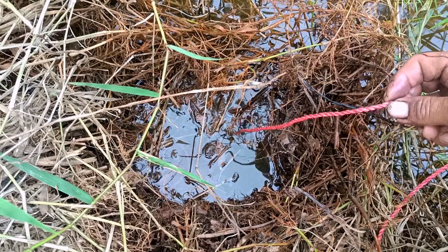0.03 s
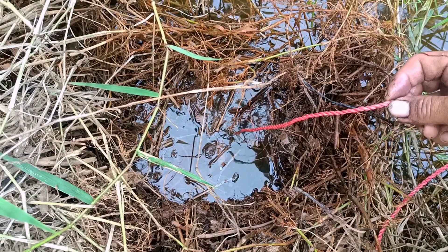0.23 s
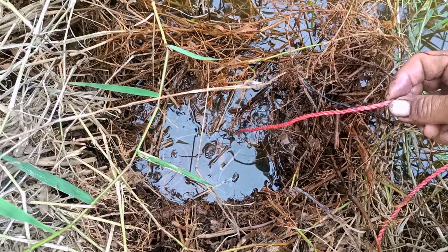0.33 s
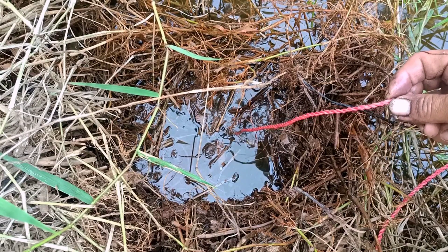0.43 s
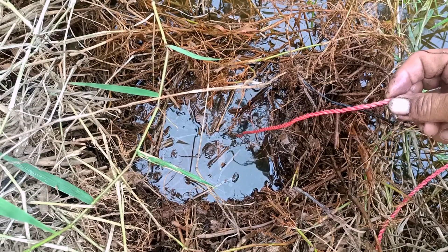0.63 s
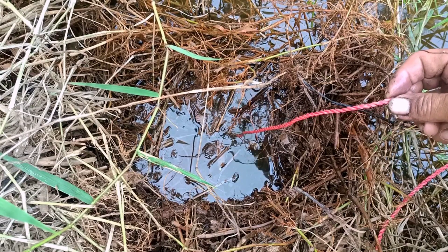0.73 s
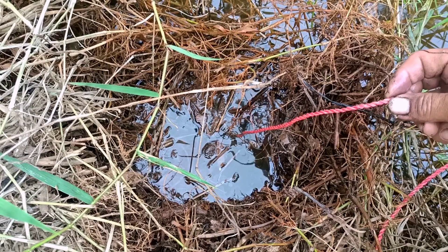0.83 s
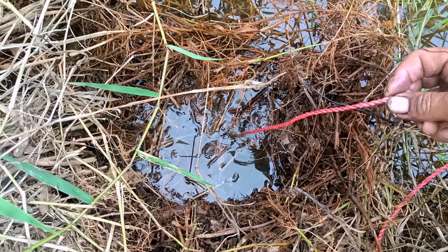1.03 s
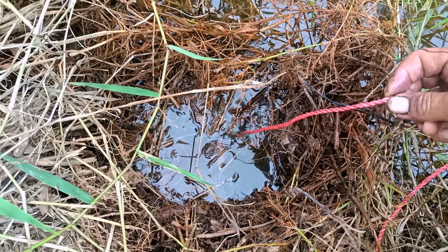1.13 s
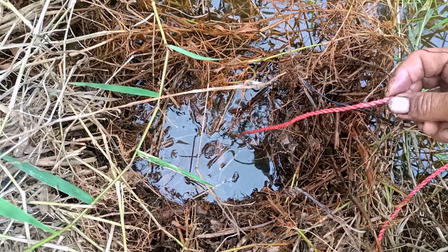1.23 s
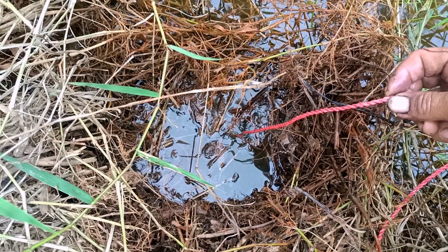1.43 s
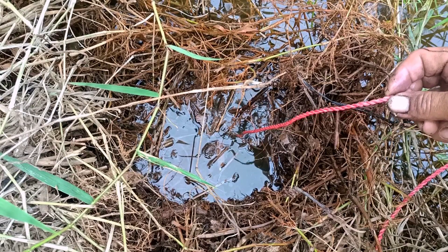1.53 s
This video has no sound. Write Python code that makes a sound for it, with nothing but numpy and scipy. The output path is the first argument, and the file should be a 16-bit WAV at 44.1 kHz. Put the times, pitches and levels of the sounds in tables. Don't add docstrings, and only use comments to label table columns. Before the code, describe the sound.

Close, crisp scraping ticks, a little to the right, come in two quick runs of three, the first tick strongest; behind them thin high insects chirr steadily outdoors over a faint far rumble and slight air hiss.

```python
import sys
import numpy as np
from scipy import signal
from scipy.io import wavfile
from scipy.ndimage import uniform_filter1d

SR = 44100
rng = np.random.default_rng(int(sys.argv[2]) if len(sys.argv) > 2 else 0)


def dump(signal):
    limited = np.clip(np.atleast_2d(signal).T, -1, 1)
    pcm = np.round(limited * 32767).astype(np.int16)
    wavfile.write(sys.argv[1], SR, pcm)


def gain_from_decibels(decibels):
    exponent = np.asarray(decibels, float) / 20
    return 10 ** exponent


N = 68355
SNAP_S = .00007
PULL_AT_S = 8 * SNAP_S


def read(points, hz):
    f, value = np.transpose(points)
    return np.interp(np.log(hz + 1), np.log(f + 1), value)


def evened(x):
    return x / np.sqrt(np.mean(x ** 2) + 1e-20)


def sides(left_db, right_db):
    return gain_from_decibels(np.array([[left_db], [right_db]]))


def add(mix, s, sound):
    part = mix[round(s * SR):][:len(sound)]
    part += sound[:len(part)]


def colour(x, points):
    size = 2048
    log_gain = np.log(gain_from_decibels(read(points, abs(np.fft.fftfreq(size, 1 / SR)))))
    phase = -signal.hilbert(log_gain).imag
    taps = np.fft.ifft(np.exp(log_gain + 1j * phase)).real[:size // 2]
    return signal.oaconvolve(x, taps)[:len(x)]


def resonate(x, hz, width):
    turn = np.exp(2j * np.pi * np.cumsum(hz * np.ones(len(x))) / SR)
    r = np.exp(-np.pi * width / SR)
    return 2 * (turn * signal.lfilter([1 - r], [1, -r], x / turn)).real


def drift(top_hz):
    t = np.arange(N) / SR
    speeds = np.geomspace(.5, top_hz, 16)
    return evened(sum(np.sin(2 * np.pi * (f * t + rng.random())) / np.sqrt(f) for f in speeds))


def hiss(points, same, patch_db):
    frames, hz = N // 256 + 5, np.fft.rfftfreq(1024, 1 / SR)
    a, b, c, d, patches = rng.standard_normal((frames, 513, 5)).T
    patches = uniform_filter1d(patches, size=6, axis=0)
    patches = evened(uniform_filter1d(patches, size=8, axis=1))
    left, other = a + 1j * b, c + 1j * d
    z = np.array([left, same * left + np.sqrt(1 - same ** 2) * other])
    z = z * gain_from_decibels(read(points, hz)[:, None] + patch_db * patches)
    return evened(signal.istft(z, nperseg=1024, noverlap=768)[1][:, :N])


def insect(hz, width, throbs, depth, left_db, right_db):
    strokes_per_s, waver, glide, swell_db = 14000, .03, .004, 1.3
    turns = np.cumsum(throbs * (1 + waver * drift(3.1))) / SR
    throb = 1 - depth * (.5 + .5 * np.cos(2 * np.pi * turns))
    strikes = rng.standard_normal((2, N)) * (rng.random((2, N)) < strokes_per_s / SR)
    level = throb * gain_from_decibels(swell_db * drift(12))
    note = hz * (1 + glide * np.sin(2 * np.pi * turns))
    wings = []
    for strike in strikes:
        ringing = resonate(strike * level, note, width)
        wings.append(evened(resonate(ringing, note, 1.5 * width)))
    return np.array(wings) * sides(left_db, right_db)


def chorus():
    # pitch in Hz, width in Hz, throbs per second, throb depth 0-1, left dB, right dB
    bands = [(9800, 720, 98, .4, -67, -108), (7080, 450, 77, .25, -90, -70.5),
             (6600, 250, 70, .3, -108, -82), (4800, 450, 72, .3, -93, -87)]
    return sum(insect(*row) for row in bands)


def caller(effort, hz, fall_hz, pace, left_db, right_db):
    sharp, rough, spread_db, pace_waver = 1.3, .0045, 1.8, .005
    first_pulse = .27
    turns = first_pulse + np.cumsum(pace * (1 + pace_waver * drift(6))) / SR
    part = turns % 1
    each = rng.standard_normal((400, 2))[turns.astype(int)]
    wobble = evened(uniform_filter1d(rng.standard_normal(N), size=60))
    note = hz * (1 + rough * (each[:, 0] + 3 * wobble)) + fall_hz * (1 - 2 * part)
    effort_db = np.interp(np.arange(N) / SR, *np.transpose(effort))
    level = np.sin(np.pi * part) ** (2 * sharp) * gain_from_decibels(spread_db * each[:, 1] + effort_db)
    tone = np.sin(2 * np.pi * np.cumsum(note) / SR)
    return evened(level * tone) * sides(left_db, right_db)


def callers():
    # pitch in Hz, fall in Hz, pulses per second, left dB, right dB
    steady = [(9900, 340, 87.6, -63.5, -110), (7080, 250, 78, -100, -78)]
    # time in seconds, level in dB
    steady_effort = [(0.0, -70.5), (0.072, -71), (0.708, -75), (0.846, -74), (1.018, -70), (1.126, -70.5),
                     (1.442, -73.5), (1.55, -70.5)]
    # pitch in Hz, fall in Hz, pulses per second, left dB, right dB
    low = (4830, 200, 70, -84, -88)
    # time in seconds, level in dB
    low_effort = [(0, -14), (.35, -12), (.48, -2), (.6, 0), (.74, -2), (.85, -12), (1.2, -14), (1.55, -9)]
    return sum(caller(steady_effort, *row) for row in steady) + caller(low_effort, *low)


def far_rumble():
    # frequency in Hz, level in dB
    spectrum = [(15, -36.5), (25, -4), (85, 3), (170, -4), (260, -16), (340, -24), (600, -39),
                (1000, -74.5)]
    return gain_from_decibels(-54.5) * hiss(spectrum, same=0.97, patch_db=1.2) * sides(-.3, .3)


def air_noise():
    # frequency in Hz, level in dB
    spectrum = [(100, -9), (300, 2), (500, -3), (1000, -6.5), (2000, -12), (4000, -19), (8000, -26),
                (16000, -28.5)]
    return gain_from_decibels(-67.5) * hiss(spectrum, same=0.17, patch_db=2)


def modes(table, chance, scale, wave):
    detune, spread_db = .012, 1.5
    t, out = np.arange(1500) / SR, 0
    for (f, db, t60), (u, v) in zip(table, chance):
        fade = gain_from_decibels(db + spread_db * u - 60 * t / t60)
        out = out - fade * wave(2 * np.pi * f * scale * (1 + detune * v) * (t - PULL_AT_S))
    return out


def snap(snap_db, ring_db, ring_hz, thud_db):
    # share of the ring pitch, level in dB, time to fall 60 dB in seconds
    ring_modes = [(1, -3, .0115), (1.07, -10, .008), (.84, -12, .008), (1.26, -20, .007), (2.06, -20, .005)]
    # frequency in Hz before a common scale of 0.908, level in dB, time to fall 60 dB in
    # seconds
    thud_modes = [(429.4, 5.5, 0.011), (515, -6, 0.026), (864, -15.5, 0.019), (1413, 20.5, 0.0017),
                  (2100, -15.5, 0.012), (2420, 4, 0.0089)]
    crack_db, crack_s, ring_rise_s = -38, .0012, .0004
    t = np.arange(1500) / SR
    chance = rng.standard_normal((2, len(thud_modes), 2))
    u = (t - PULL_AT_S) / SNAP_S
    pull = -(1 - .4 * u ** 2) * np.exp(-u ** 2 / 4)
    crack = gain_from_decibels(crack_db) * rng.standard_normal(len(t)) * t / crack_s * np.exp(1 - t / crack_s)
    ring = gain_from_decibels(ring_db) * modes(ring_modes, chance[0], ring_hz, np.cos)
    thud = gain_from_decibels(thud_db) * modes(thud_modes, chance[1], 0.908, np.sin)
    return gain_from_decibels(snap_db) * (pull + crack) + (ring + thud) * (1 - np.exp(-t / ring_rise_s))


def scrape():
    # start in seconds, swell in seconds, start dB, top dB, fade in seconds
    strokes = [
        (0.2349, 0.025, -29, -24, 0.031),
        (.396, 0.025, -62, -43, 0.03),
        (0.754, 0.013, -46, -40, 0.022),
        (0.58, 0.022, -36, -35, 0.028),
        (0.9261, 0.02, -39, -30, 0.017),
        (1.1165, 0.021, -38, -35, 0.034),
    ]
    fizz_levels = [-5, -8, -8, -12, -12.5, -9]
    # frequency in Hz, level in dB
    fizz_spectrum = [(4000, 6), (6500, -1), (9000, -5), (12000, 2), (14600, -10), (16000, -3.5)]
    fade_db, stop_s, slips_per_s, slip_spread_db, fizz_patch_db = 16.5, 0.0041, 3000, 4.5, 3.5
    t, level = np.arange(N) / SR, np.zeros(N)
    for start, swell, start_db, top_db, fade in strokes:
        u = t - start
        rising = start_db + (top_db - start_db) * u / swell
        falling = top_db - fade_db * (u - swell) / fade
        stop = np.clip((swell + fade - u) / stop_s, 0, 1)
        level += (u > 0) * stop * gain_from_decibels(np.where(u < swell, rising, falling))
    draw, size = rng.random(N), rng.exponential(1, N)
    slips = level * (draw < slips_per_s / SR) * gain_from_decibels(slip_spread_db * np.minimum(size, 4) - 8)

    tops = [row[0] + row[1] for row in strokes]
    tops, fizz_db = np.transpose(sorted(zip(tops, fizz_levels)))
    patchy = evened(uniform_filter1d(rng.standard_normal(N), size=130))
    fizz = level * colour(rng.standard_normal(N), fizz_spectrum)
    out = gain_from_decibels(np.interp(t, tops, fizz_db) + fizz_patch_db * patchy) * fizz

    kind = rng.integers(0, 12, N)
    for k in range(12):
        slip = snap(-5, -7, 3250 * (1 + .12 * rng.standard_normal()), -14)
        out = out + signal.oaconvolve(slips * (kind == k), slip)[:N]
    return out


def blip(db, hz, rise):
    t = np.arange(900) / SR
    return gain_from_decibels(db) * (t / rise) ** 2 * np.exp(2 - 2 * t / rise) * np.sin(2 * np.pi * hz * t)


def tick_part():
    one_s = [.2344, .2401, .2426, .2443, .2495, .2539, .2643, .2666, .4198, .4221, .4242]
    one_more_s = [.5808, .5842, .5875, .5933, .6001, .6054, .6113, .6140]
    two_s = [.7557, .7678, .7691, .9393, .9417, .9466, .9491]
    two_more_s = [1.1165, 1.1175, 1.1198, 1.1251, 1.1314, 1.1388, 1.1415, 1.1448, .9283, .9335, .9555,
                  1.150]
    # snap dB, ring dB, ring pitch in Hz,
    # thud dB
    snaps = [(-35, -21.5, 4136, -46), (-34, -22, 3950, -43), (-28, -27, 3900, -48.5),
             (-33, -17, 3650, -40), (-30, -14, 3600, -39), (-16, -4.5, 3480, -33), (-4, -9, 3050, -22),
             (-24, -20, 3300, -24.5), (-36, -44, 3350, -31), (-15, -29, 3450, -24),
             (-19, -31, 3450, -25), (-40, -28, 3605, -53), (-34, -33, 3400, -45), (-40, -31, 3300, -48),
             (-19, -22, 3380, -38), (-28, -27, 3400, -38), (-23, -22, 3100, -36), (-26, -14, 3350, -34),
             (-21, -29, 3200, -31),
             (-46, -50, 3300, -40), (-13, -23, 3300, -25), (-26, -34, 3400, -30), (-42, -32, 3400, -44),
                 (-30, -26, 3400, -40), (-24, -16, 3000, -31), (-14, -14, 3150, -21), (-32, -23, 2950, -42),
                 (-27, -21, 3500, -42), (-36, -23, 3600, -42), (-33, -32, 3200, -40), (-23, -28, 3200, -38),
                 (-18, -14, 3300, -33), (-15, -16, 3250, -21), (-34, -29, 3200, -32), (-48, -31, 3350, -50),
                 (-48, -35, 3200, -50), (-46, -33, 3250, -48), (-46, -33, 3300, -48)]
    # time in seconds, snap dB, ring dB, ring Hz, thud dB
    taps = [
        (0.16, -49.5, -45.5, 2450, -51),
        (0.504, -72, -59, 4150, -61),
        (0.706, -71, -59, 3400, -60.5),
        (0.871, -80, -88.5, 4110, -50),
        (.8730, -43, -80, 4240, -47.5),
        (1.068, -70, -73, 3370, -59.5),
        (1.287, -69, -78, 3300, -73),
    ]
    # time in seconds, level
    # in dB, pitch in Hz, rise in seconds
    body_rings = [(.6715, -56, 3650, .0025), (.681, -62, 3500, .002), (1.0255, -63.5, 3610, .002),
                  (1.064, -64, 1500, .003), (.2636, -25, 7100, .0011), (.578, -47, 6400, .001),
                  (.5928, -41, 6500, .001), (.424, -50, 6300, .001), (.254, -34, 14800, .0008),
                  (.593, -47, 14900, .0012), (.605, -45, 15000, .0008), (.5935, -35, 2150, .001),
                  (.2645, -18, 2200, .0008), (.869, -60, 4200, .002)]
    x = np.zeros(N)
    for s, row in zip(one_s + one_more_s + two_s + two_more_s, snaps):
        add(x, s, snap(*row))
    for s, *levels in taps:
        add(x, s, snap(*levels))
    for s, *ring_row in body_rings:
        add(x, s, blip(*ring_row))
    return signal.sosfilt(signal.butter(4, 290, "high", fs=SR, output="sos"), x + scrape())


def ticks():
    # frequency in Hz, level in dB
    left_shade = [(300, -1), (700, -3), (1400, 1.5), (3400, 1.5), (5300, -4), (6800, -22), (9500, 4),
                  (14000, -4)]
    near_db, near_t60_s, left_db, left_near_db, left_lag = -15.5, .035, -6, -1.5, 8
    x = tick_part()
    t = np.arange(3000) / SR
    near = rng.standard_normal((2, len(t))) * gain_from_decibels(-60 * t / near_t60_s) * (t > .0015)
    near = gain_from_decibels(near_db) * near / np.linalg.norm(near[0])
    wet = signal.fftconvolve(x[None], near, axes=1)[:, :N]
    left = np.roll(x, left_lag) + gain_from_decibels(left_near_db) * wet[0]
    return np.array([gain_from_decibels(left_db) * colour(left, left_shade), x + wet[1]])


def microphones(close, bugs):
    # frequency in Hz, level in dB
    left_port = [(3600, -3.5), (5000, -19.5), (6100, -16.5), (7500, -6), (9900, 6.5), (10800, 4),
                 (11300, -46), (14200, -46.5)]
    right_port = [(3600, -0.5), (6000, 6.5), (8200, 5), (9900, -6.5), (10400, -29.5), (11300, -13),
                  (12200, -3.5), (14300, 10)]
    left_edge = [(14200, 0), (15200, -25)]
    left_top = [(10600, 0), (11000, -30)]
    left = colour(colour(close[0], left_port), left_edge) + colour(bugs[0], left_top)
    right = colour(close[1], right_port) + bugs[1]
    return np.array([left, right])


def scene():
    bugs = chorus() + callers()
    rumble = far_rumble()
    close = air_noise() + ticks()
    return microphones(close, bugs) + rumble


def top_cut(x):
    return signal.sosfilt(signal.butter(12, 16640, fs=SR, output="sos"), x)


def record(dry):
    ceiling, edge_hz = 0.938, 15600
    x = ceiling * np.tanh(dry / ceiling)
    low_pass = signal.firwin(511, edge_hz, window=("kaiser", 9), fs=SR)
    x = signal.oaconvolve(x, low_pass[None], "same")
    return top_cut(x)


dry = scene()
out = record(dry)
dump(out)
```